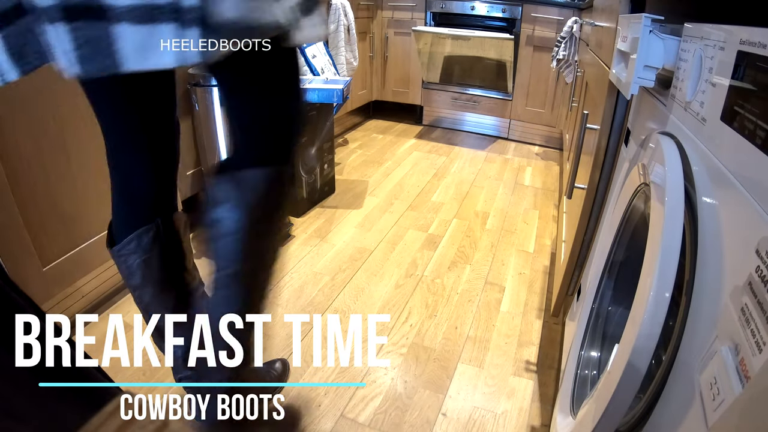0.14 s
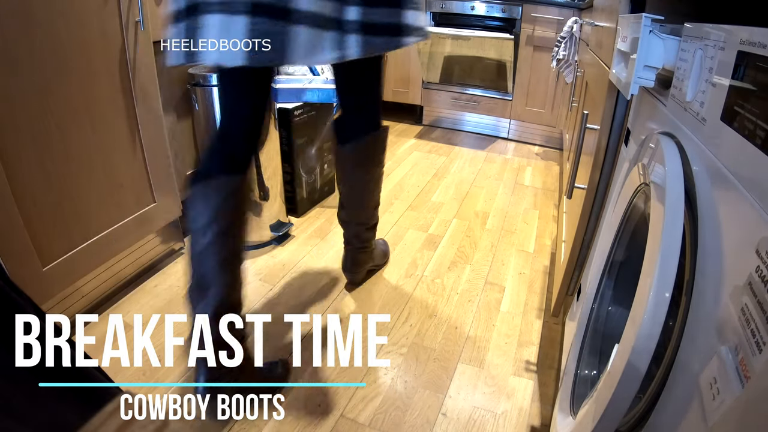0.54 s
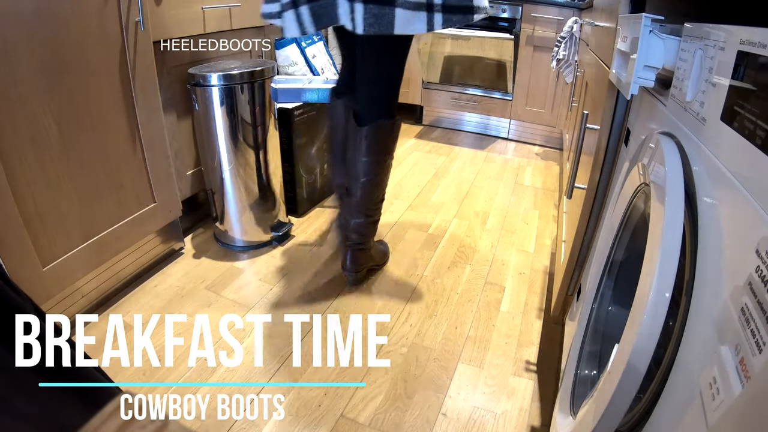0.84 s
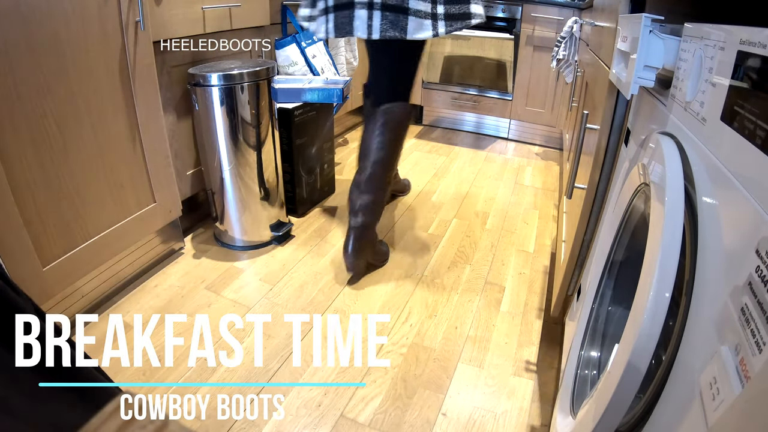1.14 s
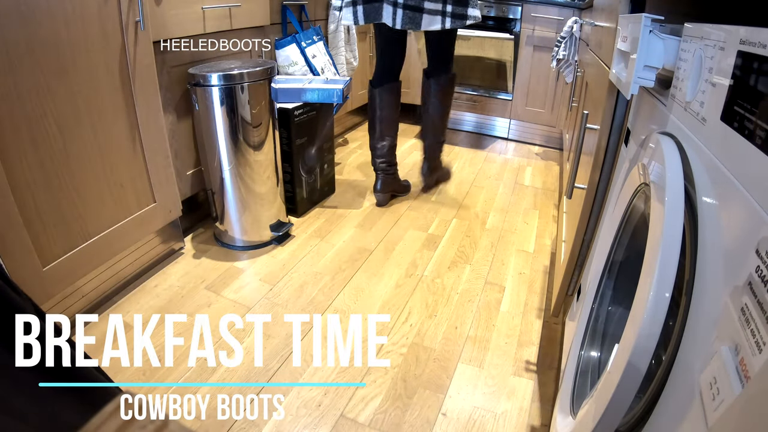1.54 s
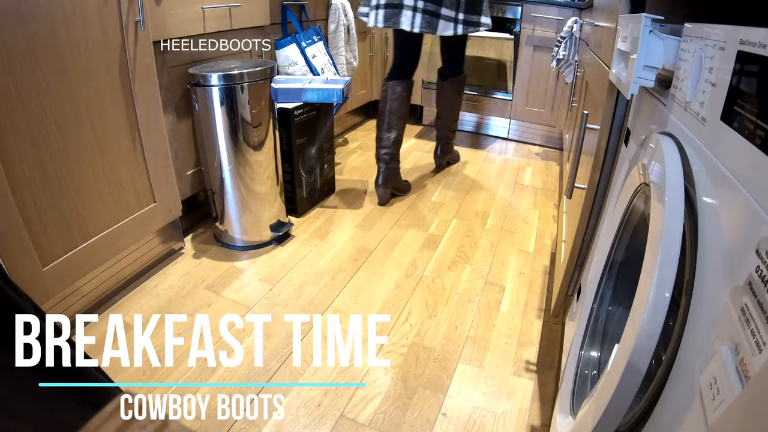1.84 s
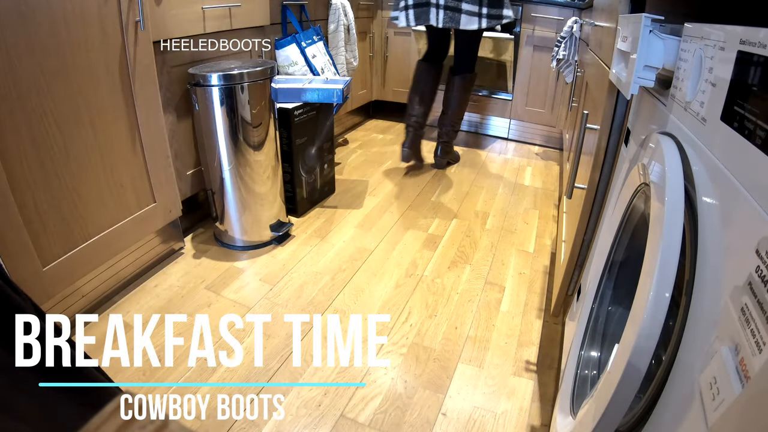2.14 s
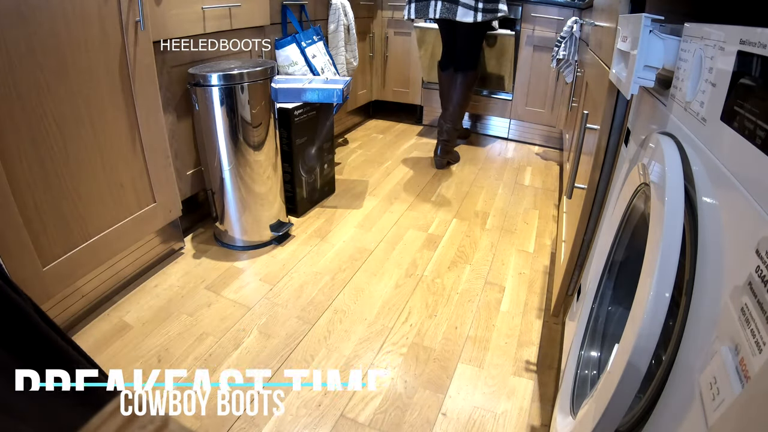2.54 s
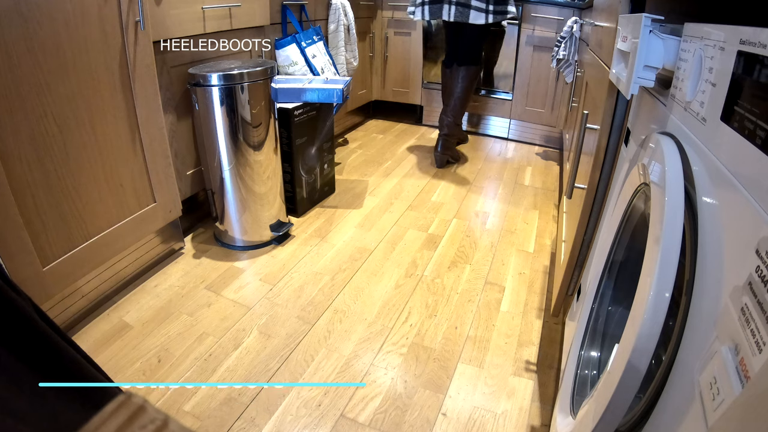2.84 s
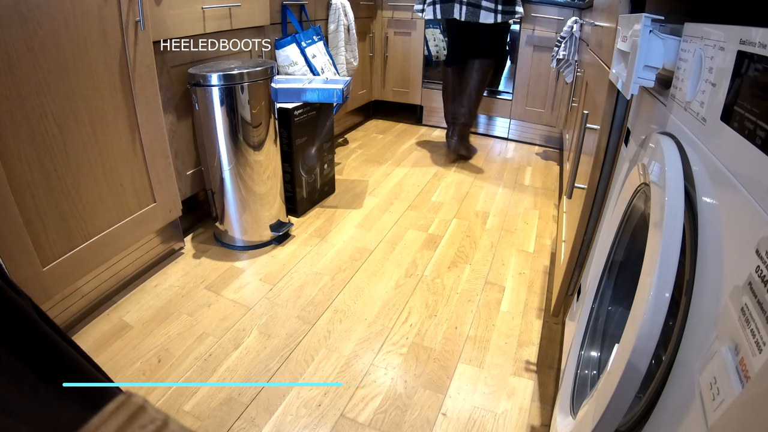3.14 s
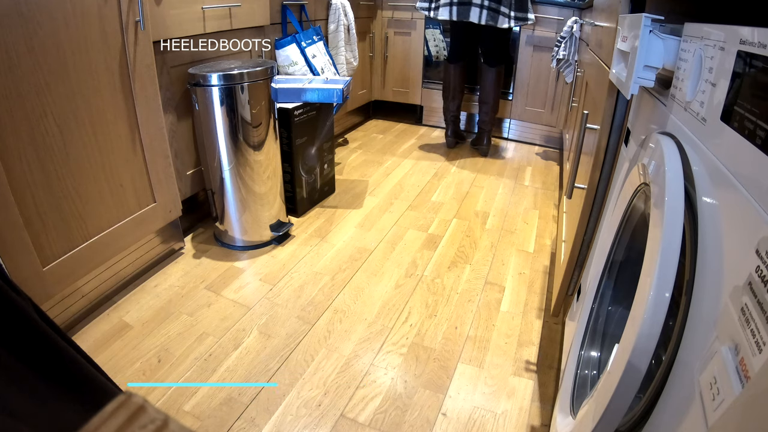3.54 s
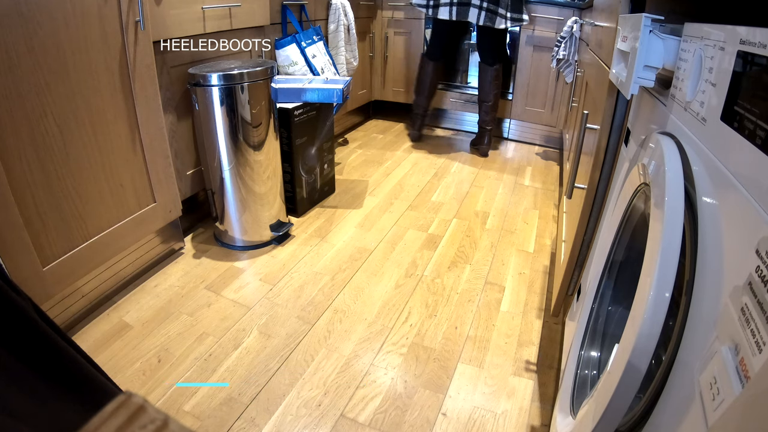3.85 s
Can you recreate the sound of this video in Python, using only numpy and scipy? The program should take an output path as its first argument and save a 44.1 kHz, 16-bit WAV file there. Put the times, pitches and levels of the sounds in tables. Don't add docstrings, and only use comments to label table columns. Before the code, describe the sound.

Boot heels crack and ring on wooden boards in a quietly humming kitchen, then a low boom.

```python
import sys
import numpy as np
from scipy import signal
from scipy.fft import rfft, irfft, next_fast_len
from scipy.io import wavfile
from scipy.ndimage import uniform_filter1d

SR = 44100
rng = np.random.default_rng(int(sys.argv[2]) if len(sys.argv) > 2 else 0)


def int16_out(signal):
    q = np.round(np.clip(np.atleast_2d(signal).T, -1, 1) * 32767)
    wavfile.write(sys.argv[1], SR, q.astype(np.int16))


def volts_from_decibels(level):
    exponent = np.asarray(level, float) / 20
    return 10 ** exponent


N = 176400


def unit(x):
    return x / np.sqrt(np.mean(x ** 2) + 1e-20)


def along(points, hz, column=1):
    columns = np.transpose(points)
    return np.interp(np.log(hz + 1), np.log(columns[0] + 1), columns[column])


def filtered(x, response):
    n = x.shape[-1]
    padded = next_fast_len(n + 8192)
    hz = np.fft.rfftfreq(padded, 1 / SR)
    return irfft(rfft(x, padded) * response(hz), padded)[..., :n]


def causal(db):
    cepstrum = irfft(np.maximum(db, -120) * np.log(10) / 20)
    half = len(cepstrum) // 2
    folded = np.r_[cepstrum[0], 2 * cepstrum[1:half], cepstrum[half], np.zeros(half - 1)]
    return np.exp(rfft(folded))


def add(out, s, x):
    i = round(s * SR)
    out[:, i:i + x.shape[1]] += x[:, :N - i]


def smooth_patches(shape, bands, frames):
    field = uniform_filter1d(rng.standard_normal(shape), size=bands, axis=0)
    return uniform_filter1d(field, size=frames, axis=1)


def hush(spectrum, depth_db):
    z = signal.stft(rng.standard_normal((2, N)), nperseg=1024)[2]
    patches = volts_from_decibels(depth_db * unit(smooth_patches(z.shape[1:], 8, 6)))
    pair = signal.istft(z * patches, nperseg=1024)[1][:, :N]
    return unit(filtered(pair, lambda hz: volts_from_decibels(along(spectrum + [(22050, -120)], hz)) * (hz > 20)))


def opening():
    start_s, length_s = 0.32, 0.81
    return np.clip((np.arange(N) / SR - start_s) / length_s, 0, 1)


# (frequency [Hz], time to fall 60 dB [s])
KITCHEN_ECHO = [(100, 0.39), (300, 0.25), (1000, 0.32), (3000, .3), (8000, 0.48), (14000, 0.38)]


def contact(length_s, colour_db, blow=0, clump_db=2.0):
    n = SR // 2
    t = np.arange(n) / SR
    length_s = max(length_s, 1e-3)

    snap = 7.5 * np.exp(-(length_s / 0.018) ** 2 - t / 0.00074)
    shape = snap + np.exp(-(t / length_s) ** 2) * np.tanh(t / (0.08 * length_s))
    if blow:
        slam_delay_s, slam_softness_s = 0.00144, 0.000092
        late = np.maximum(t - slam_delay_s, 0)
        slam = late * np.exp(-late / slam_softness_s)
        direct = -blow * slam / slam.sum()
    else:
        noise, grain_size = rng.standard_normal((2, n))
        grit = noise * volts_from_decibels(3 * unit(uniform_filter1d(grain_size, size=40))) * shape
        direct = grit / np.linalg.norm(grit)

    hz, frames, z = signal.stft(rng.standard_normal((2, n)), SR, nperseg=128)
    ticks = uniform_filter1d(rng.standard_normal(z.shape[1:]), size=12, axis=0)
    patches = smooth_patches(z.shape[1:], 3, 24)
    clumps = volts_from_decibels(clump_db * unit(ticks) + 2 * unit(patches))
    fed = np.interp(frames, t, uniform_filter1d(shape ** 2, size=64))[None]
    decay = volts_from_decibels(-120 * frames / along(KITCHEN_ECHO, hz)[:, None])
    power = signal.fftconvolve(fed, decay, axes=1)[:, :len(frames)]
    tail = signal.istft(z * np.sqrt(abs(power)) * clumps, SR, nperseg=128)[1]
    tail *= volts_from_decibels(4) / np.linalg.norm(tail[0])
    room_delay_s = 0.0015
    sound = np.pad(tail, ((0, 0), (round(room_delay_s * SR), n)))[:, :n]
    sound[0] += direct

    def colour(hz):
        return causal(colour_db(hz)) / np.sqrt(np.mean(volts_from_decibels(2 * colour_db(hz))))

    return filtered(sound, colour) * np.sqrt(SR / 50)


def ring(modes, longest_s, unsteady, size=SR // 3):
    t = np.arange(size) / SR
    drift = np.cumsum(rng.standard_normal((len(modes), size)), axis=1) * unsteady
    drift = uniform_filter1d(uniform_filter1d(drift, size=90), size=90)
    total = np.zeros(size)
    for (hz, db, t60, bloom), phase in zip(modes, drift):
        decay = volts_from_decibels(db - 60 * t / min(t60, longest_s))
        swell = 1 - np.exp(-(t / bloom) ** 2)
        total += decay * np.sin(2 * np.pi * hz * t + phase) * swell
    return total * [[1], [.3]]


# (frequency [Hz], level [dB])
WAKING_COLOUR = [(60, -13.5), (205, 3.5), (600, -13), (1600, -22.5), (2800, -38.5), (3900, -20.5),
                 (6000, -22), (7500, -34), (15500, -41)]


def waking_noise():
    return (1 - opening()) ** 0.078 * volts_from_decibels(-76) * hush(WAKING_COLOUR, 2.4)[0]


# (frequency [Hz], level [dB])
FLOOR_COLOUR = [(50, -46), (110, -4), (180, 4), (700, -5.5), (1000, -22), (2200, -27.5), (4500, -44),
                (8000, -58.5), (14000, -89)]
# (time [s], level [dB], contact length [s], pitch factor [ratio])
THUDS = [(0.034, -80.5, 0.012, 2.7), (.498, -62, 0.045, 0.9), (0.874, -82, 0.0088, 0.9),
         (1.121, -47, 0.0033, 1.01), (1.26, -79.5, 0.093, 1.3), (1.535, -69, 0.0074, 1.14),
         (1.806, -46.5, 0.011, 1.03), (1.955, -53.5, 0.0059, 1.24), (2.272, -50.5, 0.015, 0.94),
         (2.39, -58, 0.064, 1.06), (2.638, -47.5, 0.051, 0.96), (2.662, -46, 0.01, 0.66),
         (2.88, -57, 0.029, 1), (3.073, -37, 0.058, 0.9), (2.165, -60, 0.082, 0.77),
         (3.347, -39.5, 0.0056, 0.85), (3.49, -68.5, 0.0086, 1.5), (3.694, -68, 0.026, 0.41),
         (3.745, -89, 0.018, 0.87)]
# (frequency [Hz], level [dB])
SCUFF_COLOUR = [(530, -27.5), (1000, -4.5), (2200, -1), (3200, 0), (5300, -7), (7700, -7.5), (9500, -20.5),
                (15500, -34.5)]
# (time [s], level [dB], contact length [s], tilt [dB per octave])
SCUFFS = [(0.484, -72.5, 0.0048, 5), (0.497, -57.5, 0.0044, -4), (1.053, -61.5, 0.0021, 5.5),
          (1.121, -59.5, 0.0039, -2.5), (1.249, -81, 0.02, 4), (1.807, -55.5, 0.042, 1.5),
          (1.957, -68.5, 0.012, 1.5), (2.262, -65.5, 0.023, -1.5), (2.389, -61.5, 0.028, 2),
          (2.521, -68, 0.0067, 11.5), (2.654, -65.5, .04, 2), (2.772, -71, 0.037, 7),
          (2.874, -59.5, 0.025, 0), (3.066, -52.5, 0.025, -1.5), (3.346, -60, 0.015, 7),
          (3.49, -73.5, 0.059, -2), (1.127, -61.5, .002, -1.5), (1.062, -66, 0.016, -1),
          (2.636, -76.5, .01, 15), (2.684, -66.5, 0.0047, -10.5), (2.888, -70.5, .004, 0),
          (2.411, -71.5, .004, 3), (2.295, -69.5, .02, -0.5), (3.189, -81.5, 0.056, -1),
          (3.239, -74, 0.011, -5.5), (3.355, -53.5, .008, -3.5), (0.501, -71, 0.0086, 1.5),
          (1.8074, -56, 0.0049, -5), (2.27, -71.5, .004, -5), (3.084, -53, 0.0051, -2.5)]


def soles():
    out = np.zeros((2, N))
    for s, db, length_s, pitch in THUDS:
        add(out, s, volts_from_decibels(db) * contact(length_s, lambda hz: 1.04 * along(FLOOR_COLOUR, hz / pitch)))
    for s, db, length_s, tilt_db in SCUFFS:
        def colour(hz):
            tilt = tilt_db * np.log2((hz + 200) / 4000)
            low_cut = 12 * np.maximum(0, np.log2(900 / (hz + 1)))
            return along(SCUFF_COLOUR, hz) + tilt - low_cut

        add(out, s, volts_from_decibels(db) * contact(length_s, colour, clump_db=3.6))
    return out


# (frequency [Hz], level [dB])
HUM_COLOUR = [(13, -14), (22, -3), (60, -7.5), (102, -17), (150, -0.5), (204, 0.5), (510, -24.5),
              (819, -16.5), (1100, -47), (1430, -58), (2420, -120)]
# (time [s], level [dB])
HUM_GAIN = [(.4, 0), (1.4, -1.5), (2.1, 4.5), (4, 5)]
# (frequency [Hz], level [dB])
AIR_COLOUR = [(590, -55), (1000, 6), (2180, -2.5), (4600, -4.5), (10300, -10.5), (12800, -10),
              (15500, -19.5)]


def room_tone():
    gain_db = np.interp(np.arange(N) / SR, *np.transpose(HUM_GAIN))
    hum = volts_from_decibels(-66 + gain_db) * hush(HUM_COLOUR, 0.59)
    air = volts_from_decibels(-79.5) * hush([(300, -33)] + AIR_COLOUR, 0.4)
    port_levels = volts_from_decibels([[0], [7]])
    return (hum + air) * port_levels * opening() ** .5


# (time [s], level [dB], contact length [s], pitch factor [ratio])
TOUCHES = [
    (0.375, -63, .004, 1.34),
    (.384, -55.5, 0.0048, 1.95),
    (1.001, -48, 0.024, 0.88),
    (1.675, -53, 0.014, 1.06),
    (2.511, -59.5, .002, 3),
    (3.328, -62, 0.0067, 2),
]
# (time [s], level [dB], hardness [dB per octave], slam [dB], crack [dB])
HEELS = [
    (.396, -18, 1.5, -6.5, -16),
    (1.0143, -16.5, -1.3, 4, -19.5),
    (1.687, -18.5, 2.5, 3, -20),
    (2.521, -20.5, -0.5, 7, -14),
    (3.339, -28, 4.5, 5, -0.5),
]
# (frequency [Hz], level [dB], time to fall 60 dB [s], swell time [s])
HEEL_TIP = [
    (1550, -0.5, 0.0058, 0.00021),
    (2620, -6.5, 0.004, 0.00057),
]
# (frequency [Hz], level [dB], time to fall 60 dB [s])
BOARDS = [
    [(267.7, -6.5, 0.32), (409, -3.5, 0.61), (579, -17, 0.3), (740, -10.5, 0.28), (888, -9.5, .15),
     (1156, -13, 0.11), (1410, -30, 0.23), (1580, -31, 0.27), (1782, -27.5, 0.24), (1945, -25.5, 0.2),
     (2236, -27.5, 0.14)],
    [(221, -1.5, 0.24), (250, -3, 0.16), (432, -1, 0.29), (539, -5, 0.35), (633, -9.5, 0.12),
     (748, -13, 0.17), (898, -25, 0.24), (1154, -25, 0.2), (1470, -23, 0.032)],
    [(192.5, 2, 0.31), (292, -31, 0.085), (391.5, 2.5, 0.32), (599, -1.5, 0.37), (616, -8.5, 0.28),
     (652, -0.5, 0.16), (486, -1.5, 0.16), (748, -8, .15), (1013, -14.5, 0.14), (1830, -17, 0.13)],
    [(162, 10.5, 0.27), (219, 8, 0.29), (282.4, -10.5, 0.11), (472, 1.5, 0.11), (637, -30.5, 0.084),
     (850, -7, 0.057), (1250, -13, 0.1), (1430, -27, 0.12), (1936, -27.5, 0.16), (2270, -29.5, 0.21)],
    [(135, 10.5, 0.16), (221.4, 5.5, 0.27), (359, -4.5, 0.55), (617, -14.5, 0.083), (827, -6.5, 0.14),
     (1180, -13, 0.13), (1520, -9, 0.11), (2100, -15, 0.12), (2380, -12.5, 0.18)],
]
# (time [s], level [dB])
TOES = [
    (.498, -55),
    (1.121, -48.5),
    (1.808, -47),
    (2.681, -42),
    (3.347, -39.5),
]


def heels():
    out = np.zeros((2, N))
    for s, db, length_s, pitch in TOUCHES:
        add(out, s, volts_from_decibels(db) * contact(length_s, lambda hz: 1.24 * along(FLOOR_COLOUR, hz / pitch)))
    for heel, board, (toe_s, toe_db) in zip(HEELS, BOARDS, TOES):
        s, db, hard_db, slam_db, crack_db = heel

        def colour(hz):
            return along(FLOOR_COLOUR, hz) + hard_db * np.log2((hz + 100) / 500)

        add(out, s, volts_from_decibels(db + crack_db) * ring(HEEL_TIP, 0.23, .01))
        add(out, s, volts_from_decibels(db - 15) * contact(0.0059, colour, blow=volts_from_decibels(slam_db)))
        heel_ring = ring([(*mode, .002) for mode in board], 0.23, .025)
        add(out, s + 0.00144, -volts_from_decibels(db - 12.5) * heel_ring)
        toe_ring = ring([(*mode, .003) for mode in board], 0.17, 0.028)
        add(out, toe_s, volts_from_decibels(toe_db) * toe_ring)
    return out


# (time [s], length [s], level [dB], frequency [Hz])
HEAVES = [(0.442, 0.26, -43, 36.2), (1.119, 0.19, -52.5, 34.6), (1.281, 0.1, -53, 36.4),
          (1.809, 0.16, -46, 37.9), (2.522, 0.12, -46.5, 56.2), (2.635, 0.11, -47.5, 64),
          (2.751, 0.12, -51, 36.7), (3.189, 0.21, -25, 34.5), (3.377, 0.16, -39.5, 37.8),
          (3.616, 0.22, -47, 37.7), (3.786, 0.45, -54, 38.5)]


def joists():
    out = np.zeros((2, N))
    for s, length_s, db, hz in HEAVES:
        t = np.arange(round(length_s * SR)) / SR
        swell = np.sin(np.pi * t / length_s)
        tone = np.sin(2 * np.pi * hz * t + rng.uniform(0, 8.9))
        add(out, s, volts_from_decibels(db - 2.5) * swell * tone * [[1], [.3]])
    return out


# (frequency [Hz], level [dB], time to fall 60 dB [s], swell time [s])
CABINET = [(34.5, 2.5, 0.49, 0.0068), (69, -3, 0.15, 0.008), (99.3, -1.5, 0.37, 0.028),
           (143, -8.5, 0.26, 0.0055), (188.2, -13.5, 0.44, 0.027), (372.3, -9.5, 0.22, 0.021),
           (593, -22.5, 0.28, 0.02), (658, -13, 0.096, 0.012)]
# (frequency [Hz], level [dB], time to fall 60 dB [s], swell time [s])
ROCK = [
    (63.84, 9, 0.29, .03),
    (83.5, -6, 0.23, 0.006),
    (130.3, -10, 0.27, 0.016),
]


def cabinet():
    out = np.zeros((2, N))
    knock_s, knock_db, rock_delay_s = 3.063, -14, 0.03805
    add(out, knock_s, volts_from_decibels(knock_db) * ring(CABINET, 1, 0.0098, size=SR))
    add(out, knock_s + rock_delay_s, volts_from_decibels(knock_db) * ring(ROCK, 1, 0.0034, size=SR // 2))
    return out


def scene():
    return soles() + room_tone() + heels() + joists() + cabinet()


# (frequency [Hz], level [dB])
MONO_COLOUR = [(30, -0.5), (200, -1.5), (1500, 5), (3000, -5), (5000, 4), (9000, -11)]


def middle(common):
    u = opening()
    mono = filtered(common, lambda hz: causal(along(MONO_COLOUR, hz)))
    return u * common + (1 - u) * mono + waking_noise()


# (frequency [Hz], level [dB], phase [rad])
STEER = [(29.8, -11.5, 4.2), (201, -7, 3.1), (610, 5.5, 2.95), (870, 3, 3), (1450, -17, 2.6),
         (4260, -31.5, 0.28), (12000, -8, .2)]
# (frequency [Hz], level [dB])
APART = [(30, -30.5), (200, -12), (600, -2.5), (1200, 2.5), (2500, -5), (5000, -7), (8000, -0.5),
         (14000, -7)]


def sides(common, differing):
    def steering(hz):
        return volts_from_decibels(along(STEER, hz)) * np.exp(1j * along(STEER, hz, column=2))

    width = filtered(differing, lambda hz: volts_from_decibels(along(APART, hz)))
    return opening() * (filtered(common, steering) + width)


def low_pass(x):
    return signal.sosfilt(signal.butter(12, 15660, fs=SR, output="sos"), x)


def record(dry):
    mid = middle(dry[0])
    side = sides(dry[0], dry[1])
    return low_pass(np.array([mid + side, mid - side]))


dry = scene()
out = record(dry)
int16_out(out)
```